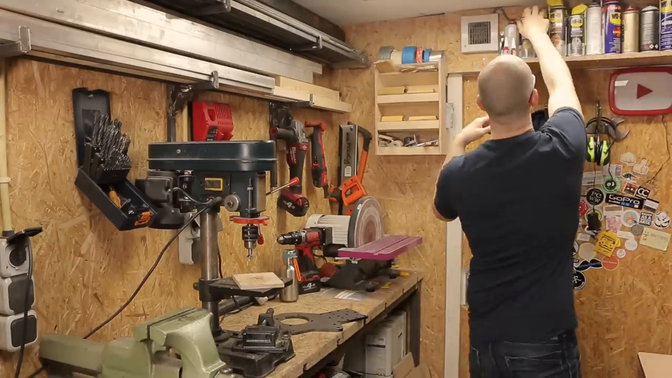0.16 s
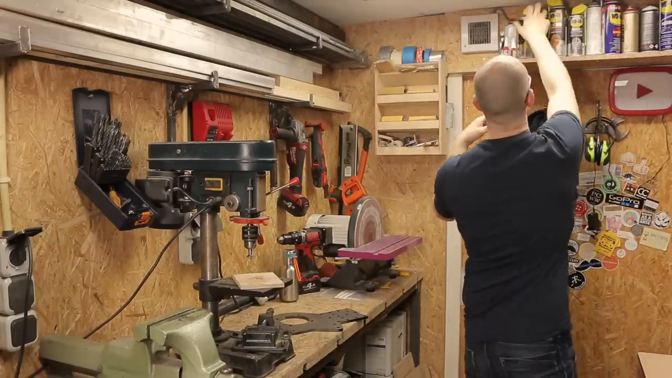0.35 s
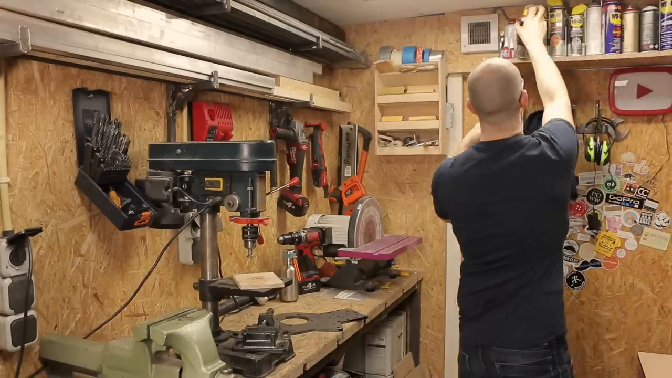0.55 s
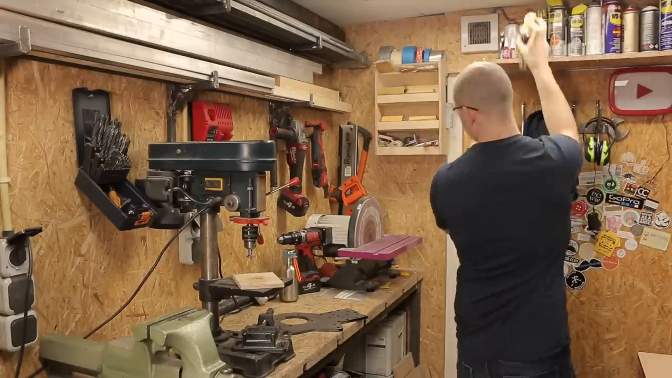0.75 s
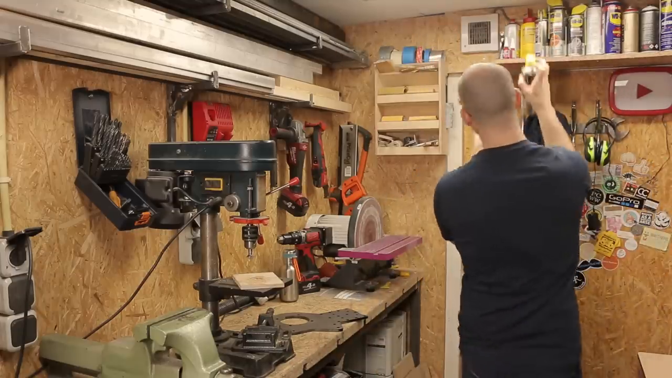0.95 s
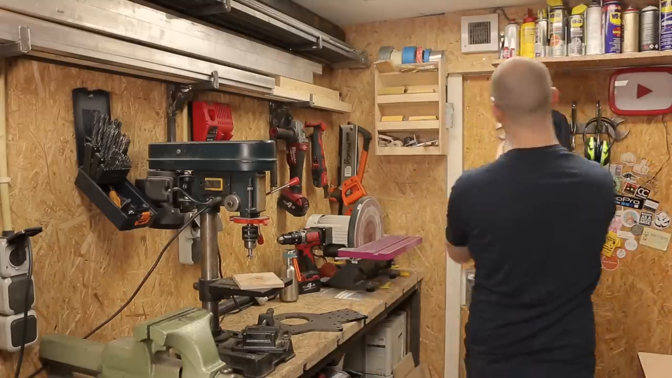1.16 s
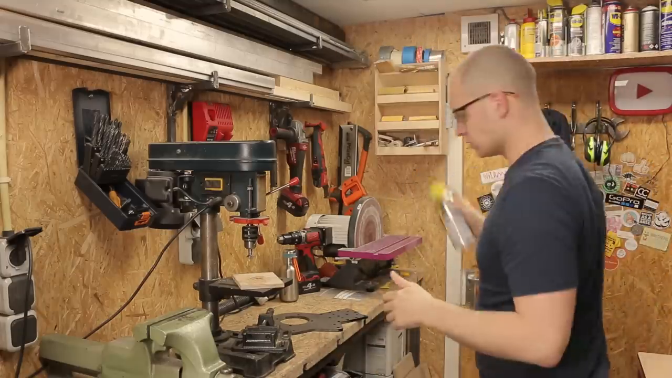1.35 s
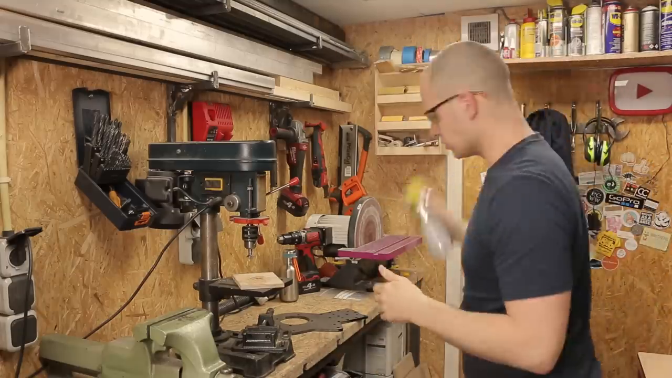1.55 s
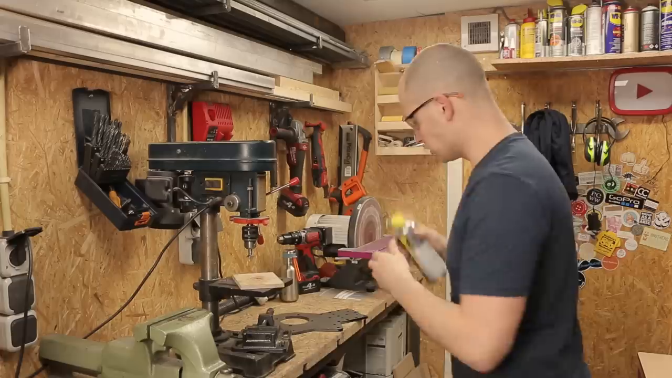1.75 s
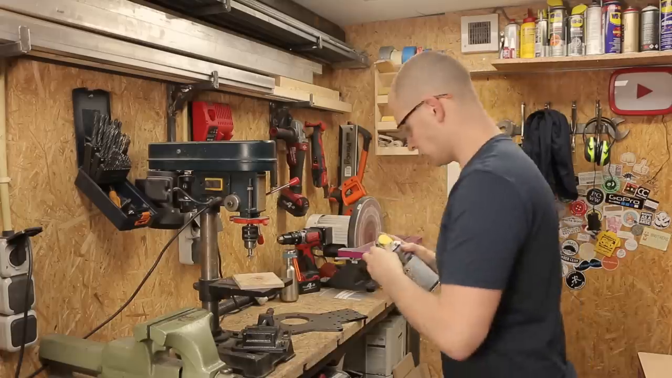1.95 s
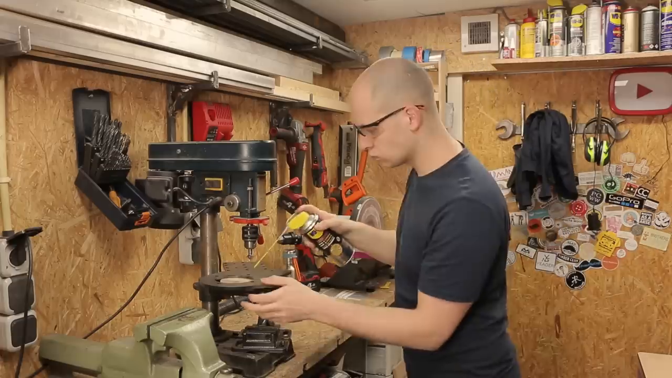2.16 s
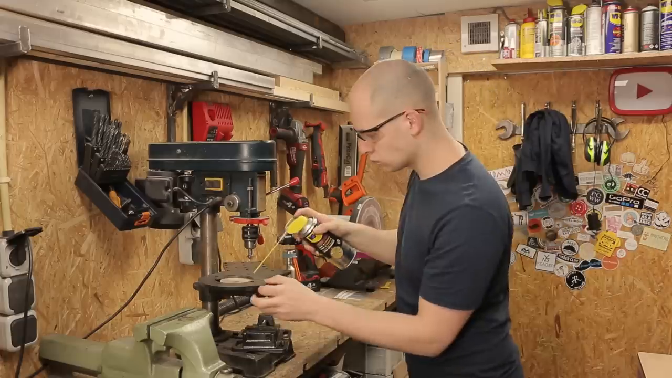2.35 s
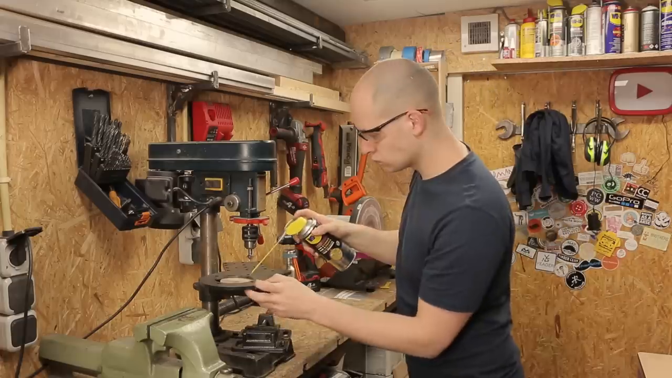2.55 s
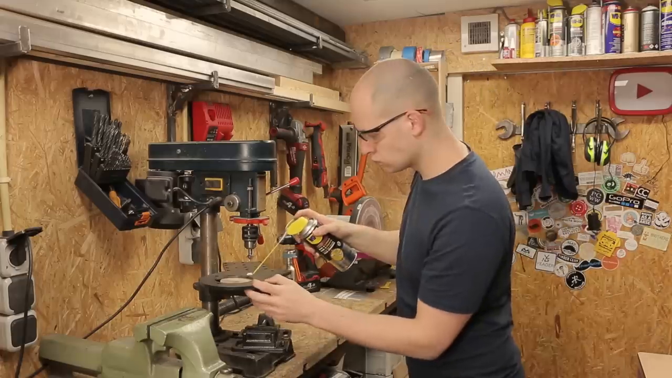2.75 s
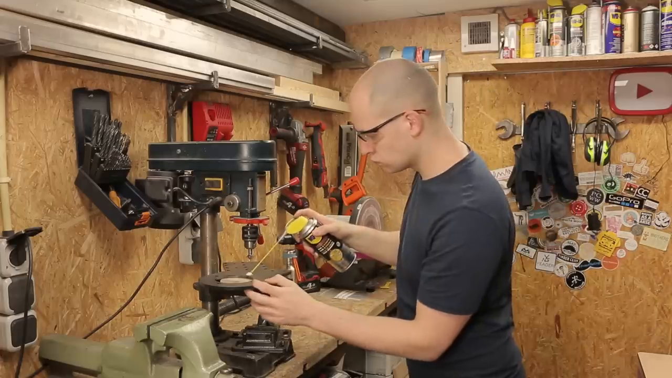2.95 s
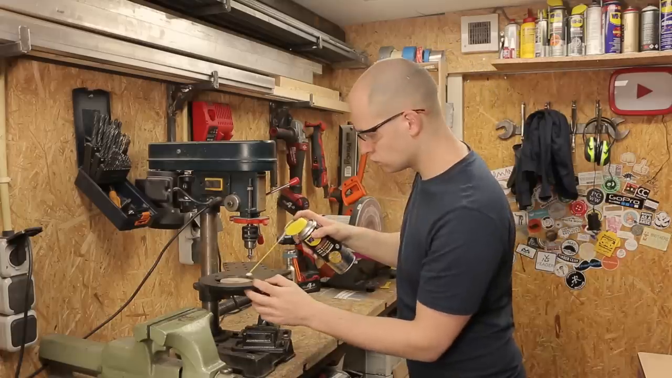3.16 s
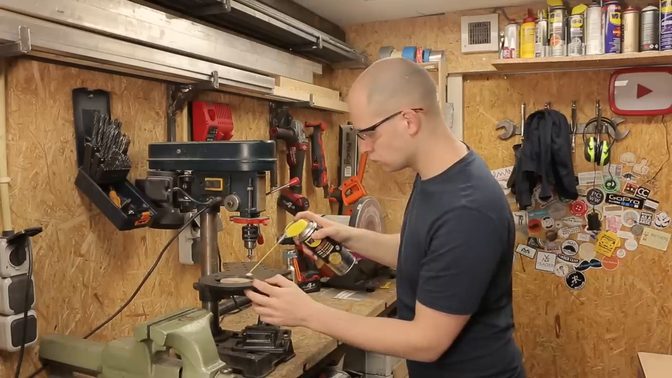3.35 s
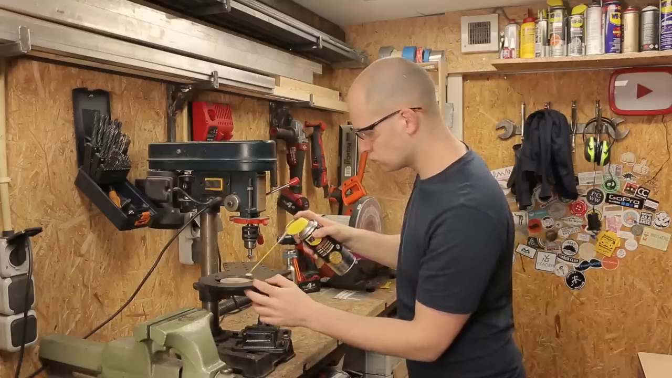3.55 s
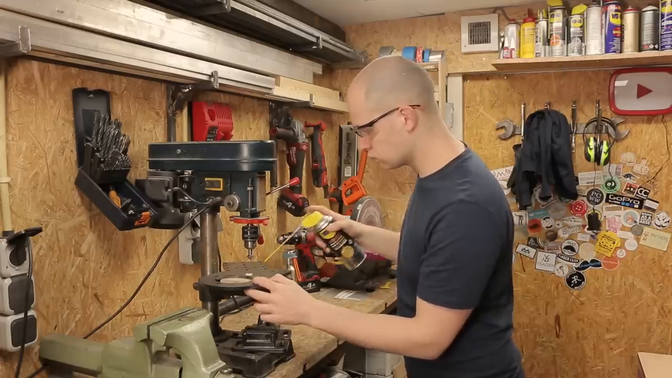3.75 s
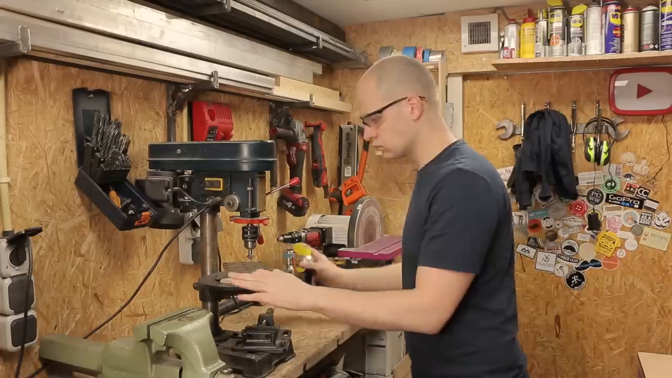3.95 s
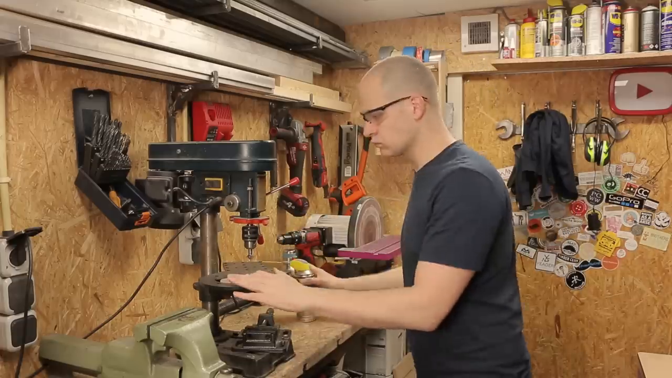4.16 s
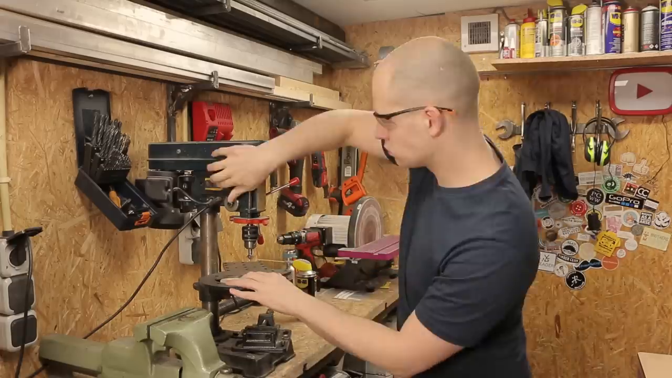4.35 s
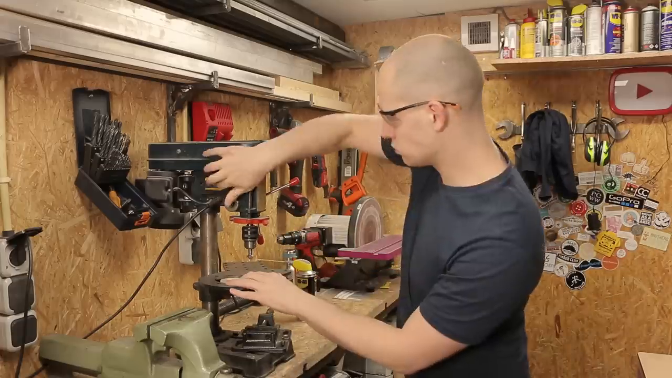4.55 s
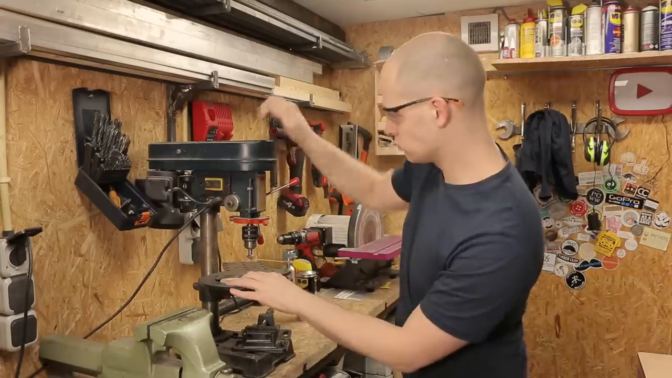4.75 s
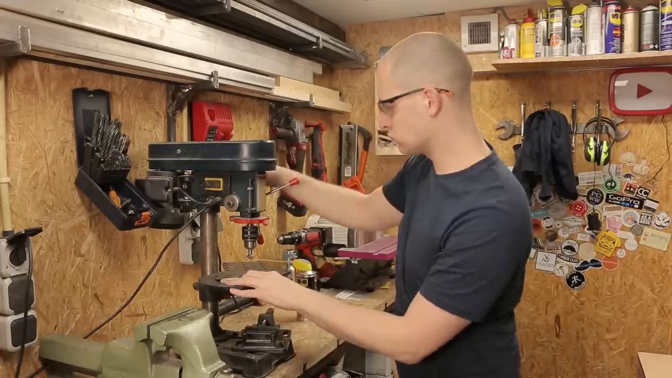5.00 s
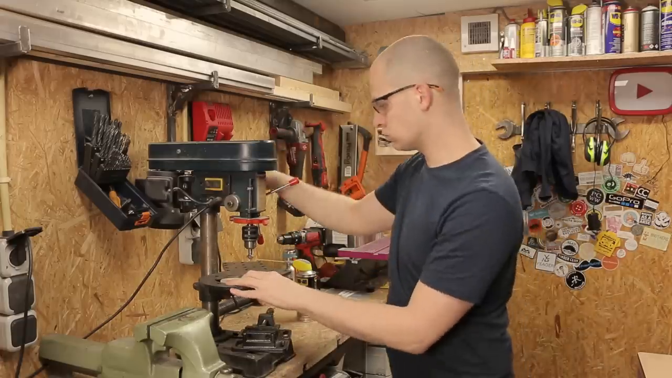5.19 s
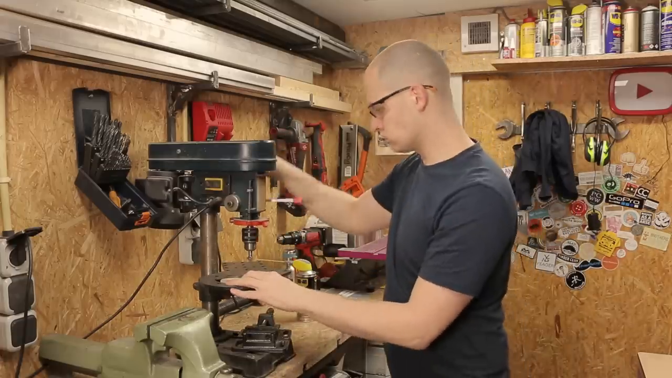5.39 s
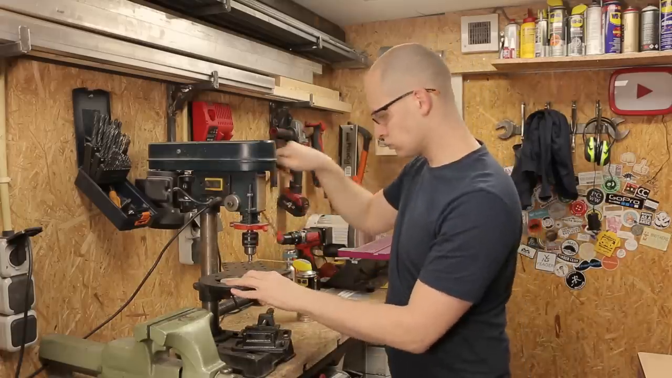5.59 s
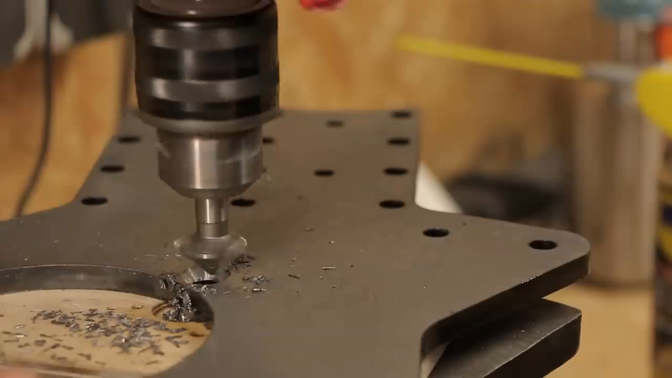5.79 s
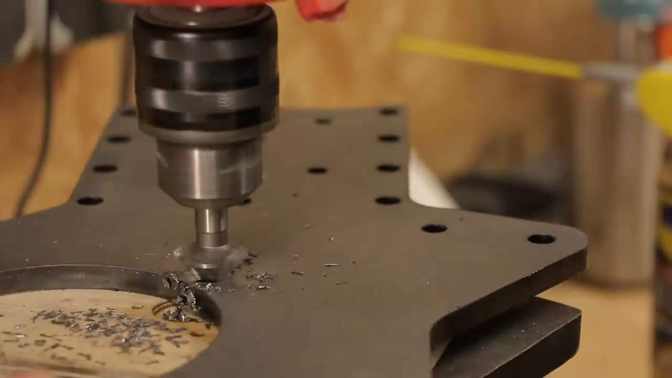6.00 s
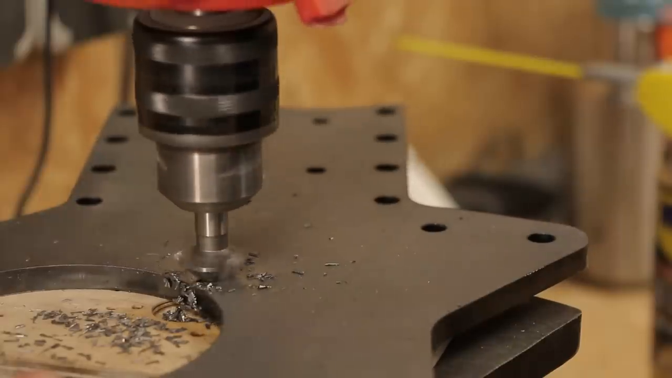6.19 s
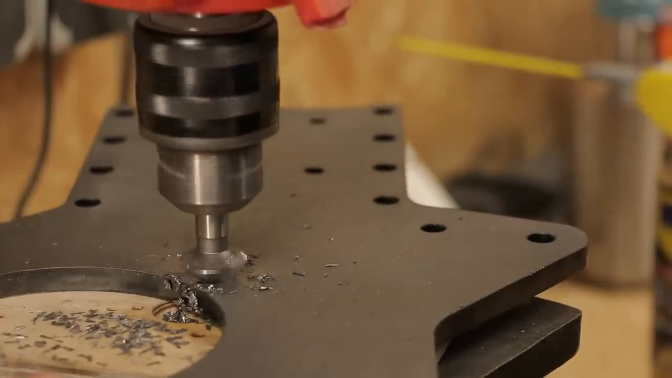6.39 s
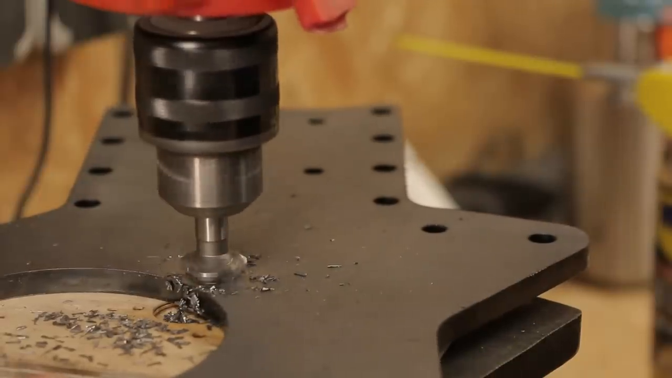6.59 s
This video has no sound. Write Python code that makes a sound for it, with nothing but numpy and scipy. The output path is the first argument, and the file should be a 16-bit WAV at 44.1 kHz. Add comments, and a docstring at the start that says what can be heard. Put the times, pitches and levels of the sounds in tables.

```python
"""A small wooden workshop, one microphone: cloth and shoes rub while a can of cutting oil bumps off a shelf.
It knocks its neighbours, its spray head clicks, and two presses send a noisy jet through a singing straw.
It lands hard on the bench as ringing modes, wobbles with an even boom and stops with a tick.
A switch snaps, hum swells up, and a countersink scrapes a steel plate once a turn: noise grains swing with
the bite and drive the resonances of plate and frame, while the belt rattles its cover."""
import sys
import numpy as np
from scipy import signal
from scipy.fft import rfft, irfft, next_fast_len
from scipy.io import wavfile
from scipy.ndimage import uniform_filter1d

SR = 44100
rng = np.random.default_rng(int(sys.argv[2]) if len(sys.argv) > 2 else 0)


def put_to_file(sound):
    """Save the sound as 16-bit audio at rate SR, in the file named by the first command-line argument."""
    columns = np.atleast_2d(sound).T  # one column per channel
    safe = np.clip(columns, -1, 1)
    whole_steps = np.round(safe * 32767)
    wavfile.write(sys.argv[1], SR, whole_steps.astype(np.int16))


N = 292559
TIME = np.arange(N) / SR   # seconds

# Room air. Each row: frequency in Hz, relative level in dB per Hz.
AIR = [(15, -49), (25, -2.5), (102, 3), (217, -15), (326, -9), (427, -14.5), (1520, -22), (1940, -19.5),
       (2350, -24.5), (4370, -21), (6380, -27.5), (14800, -29.5), (16000, -33)]
# Hiss that differs between the channels. Each row: frequency in Hz, relative level in dB per Hz.
SIDE_HISS = [(60, -6), (300, -7.0), (3000, -21.5), (16000, -12.0)]
AIR_DB, SIDE_HISS_DB = -51, -70.5   # rms
CUTOFF_HZ = 16000   # the filter's stop edge lies 600 Hz above

# Weight shifts on the floor. Each row: peak in seconds, fade in seconds, level in dB.
STEPS = [(3.33, .3, -47.5), (3.7, 0.29, -43.5)]
# Floorboard resonances. Each row: frequency in Hz, width in Hz, relative level in dB.
FLOOR = [(72, 33, 2.5), (158.8, 25, 3.0), (338, 59, -8)]

# Strokes of sleeve and shoe. Each row: peak in seconds, fade in seconds, swish in dB, scuff in dB.
STROKES = [(.02, 0.13, -49.5, -56.5), (0.563, .05, -47, -55), (.615, 0.08, -48.5, -50.5),
           (.77, 0.17, -50, -49), (.952, 0.047, -30.5, -40.5), (.985, 0.079, -41, -44),
           (1.133, 0.11, -37, -39), (1.239, 0.05, -34.5, -48), (1.334, 0.091, -40, -42.5),
           (1.427, .13, -35.5, -38.5), (1.58, 0.32, -39.5, -46.5), (1.658, 0.11, -33, -30.5),
           (1.763, 0.094, -40.5, -37.5), (2.32, 0.16, -55, -57)]
# Cloth swish. Each row: frequency in Hz, relative level in dB per Hz.
SWISH = [(1060, -94), (1800, 2), (2260, -8), (4210, 4), (5250, -3), (7910, -7.5), (15100, -18),
         (16000, -35)]
# Shoe and sleeve scuff. Each row: frequency in Hz, relative level in dB per Hz.
SCUFF = [(120, -62), (200, -11), (422, -2), (484, -15), (600, -4.5), (815, -7.5), (1080, -2), (1400, -6),
         (3000, -9), (3900, -37), (6600, -120)]

# Crack of any hard contact. Each row: frequency in Hz, relative level in dB per Hz.
CRACK = [(100, -0.5), (400, 8.5), (1400, 4), (2500, 0), (4300, 1), (6500, -7.5), (10000, -17.5),
         (16000, -30)]
# Hand and can bump the shelf. Each row: start in seconds, ring gain in dB, crack in dB, pitch factor.
SHELF_BUMPS = [(.2235, -35, -49, 0.97), (.264, -23, -50.5, 1.1), (.464, -28, -45.5, 0.63),
               (.478, -41, -58, 1.08), (.492, -26, -63, 0.31), (.53, -37, -68, 0.41),
               (.551, -47.5, -55, 0.91), (.706, -37.5, -51, 1.11)]
# Shelf modes. Each row: frequency in Hz before the pitch factor, relative level in dB, t60 in seconds.
SHELF_MODES = [(64.4, -16, 0.25), (154, -2.5, 0.096), (194.5, -0.5, 0.16), (265, -4, 0.054),
               (611, -2, 0.044), (736, -1.5, 0.014), (950, -5, 0.016)]
# The can knocks its neighbours. Each row: start in seconds, ring gain in dB, crack in dB, pitch factor.
CAN_KNOCKS = [(.762, -44, -35, 0.98), (.921, -17, -47, 0.96), (.927, -29, -22, 0.98),
              (.937, -30, -25.5, 1.1), (.955, -31, -50, 1.04), (1.134, -24, -34, .74),
              (1.14, -34, -35, 1.05), (1.229, -43, -44, 1.6), (1.753, -32.5, -46, 1.7),
              (1.764, -30, -46, 1.16)]
# Can modes. Each row: frequency in Hz before the pitch factor, relative level in dB, t60 in seconds.
CAN_MODES = [(410, -14.5, 0.081), (775, -7, 0.033), (940, 4.5, 0.031), (1060, -1, 0.035), (1116, -8, 0.14),
             (1294, 1.5, 0.026), (1530, -6.5, 0.029), (1880, -15, 0.056), (4100, -28, 0.11)]
# The can slides off the shelf. Each row: start in seconds, level in dB.
SQUEAK = [(1.069, -39.5)]
# The spray head clicks in the fingers. Each row: start in seconds, ring gain in dB, crack in dB, pitch factor.
NOZZLE_CLICKS = [(1.402, -26.5, -36, 0.9), (1.415, -25, -32, 0.88), (1.85, -41.5, -52, 0.98),
                 (1.93, -43, -53, 0.87), (1.978, -37, -44, 0.92), (2.133, -43, -36, 1.2),
                 (2.141, -49, -38, 1.0), (2.3578, -10, -40, 0.91), (2.3595, -23, -32, 1.05)]
# Spray head modes. Each row: frequency in Hz before the pitch factor, relative level in dB, t60 in seconds.
NOZZLE_MODES = [(730, -27, 0.072), (1036, -14.5, 0.029), (1250, -13.5, 0.017), (1810, -18, 0.039),
                (1840, -13, 0.023), (1905, 2.5, 0.027), (2330, 1.5, 0.0039), (3700, -10, 0.0099),
                (4210, -19, 0.025), (4700, -17.5, 0.028)]

# The valve is pressed twice. Each row: start in seconds, opening time constant in seconds,
# hold in seconds, jet level in dB before it sags.
PRESSES = [(2.615, 0.065, 0.38, -28.5), (3.312, 0.0093, 0.36, -34.5)]
JET_SAG_DB_PER_S, JET_RELEASE_DB_PER_S = 6, 77   # the release adds to the sag
# Surges as the finger trembles on the valve. Each row: peak in seconds, level in dB.
SURGES = [(2.684, -28), (3.07, -32), (3.155, -34.5), (3.241, -38), (3.598, -30.5), (3.687, -34),
          (3.778, -36)]
SURGE_FADE_S = 0.064
# Jet noise. Each row: frequency in Hz, relative level in dB per Hz.
JET = [(250, -10.5), (700, -1), (1500, 1), (2300, 4.5), (3000, 3.5), (3900, 6), (4800, 5), (6000, 0.5),
       (7700, -2), (9900, 2.5), (10800, -3), (13500, 1.5), (18000, -7)]
# Oil straw resonances. Each row: frequency in Hz, width in Hz, relative level in dB.
STRAW = [(3015, 96, 2), (3920, 91, 1.5), (4400, 110, -37), (6480, 51, 0), (7640, 360, -3.5),
         (9900, 120, -7), (11860, 200, -7.5), (13400, 150, -20)]
# The valve spits. Each row: start in seconds, level in dB.
SPITS = [(3.206, -37), (3.3205, -30), (3.852, -44), (3.875, -36)]
# Colour of the spits. Each row: frequency in Hz, relative level in dB per Hz.
SPIT_COLOUR = [(2000, -1), (6000, -3), (8000, 4), (17000, -16)]

# The can lands on the bench. Each row: start in seconds, ring gain in dB, crack in dB, pitch factor.
BENCH_KNOCKS = [(4.1492, 2.5, -13.5, 0.94), (4.179, -17, -32, 0.57)]
# Bench modes. Each row: frequency in Hz before the pitch factor, relative level in dB, t60 in seconds.
BENCH_MODES = [(184, -16, 0.054), (231, -3.5, 0.078), (332, 2.5, 0.026), (551, -15, 0.1),
               (684, -6.5, 0.037), (866, -36, 0.055), (1270, -39, 0.057), (1450, -1, 0.011),
               (2290, -7.5, 0.0083)]
# Boom of the rocking can. Each row: frequency in Hz, width in Hz, relative level in dB.
BOOM = [(228, 28.5, 0), (290, 49, -1.6)]
# Grit under the rim. Each row: frequency in Hz, relative level in dB per Hz.
GRIT = [(70, 12), (500, -22), (1000, -11), (2500, -29), (4500, -16), (7000, -44)]
# Last tick as the can sits flat. Each row: start in seconds, level in dB.
SEATING = [(4.382, -21.5)]
ROCK_START_S, ROCK_RISE_S, ROCK_DB, ROCK_RING_DB = 4.18, 0.024, -30.5, -49
LAST_SWING_S, LAST_SWING_DB = 0.0235, 14.5   # time before the tick; boost of boom and grit

# The switch snaps. Each row: start in seconds, ring gain in dB, crack in dB, pitch factor.
SWITCH_SNAPS = [(4.504, -30, -26, 0.92)]
# Switch modes. Each row: frequency in Hz before the pitch factor, relative level in dB, t60 in seconds.
SWITCH_MODES = [(465, -4, 1), (960, -8, .06), (1090, 0, 0.026), (2090, -10, 0.075), (4400, -5, 0.032),
                (4640, -12, 0.028)]
# The switch spring buzzes. Each row: start in seconds, level in dB.
SWITCH_SPRING = [(4.504, -32.5)]
# Spring resonances. Each row: frequency in Hz, width in Hz, relative level in dB.
SPRING = [(4270, 280, -4.5), (6400, 360, -2.5), (7300, 690, -8), (9500, 1900, -14.5)]

SWITCH_ON_S, BITE_S, DEEPEST_CUT_S, MID_CUT_S = 4.505, 4.625, 4.695, 5.65
SPINDLE_HZ = 12.37   # turns per second
# Hum of motor and pulleys. Each row: frequency in Hz, mean level in dB rms at full swell.
HUM = [(49.6, -48), (55.8, -55), (61.9, -38), (74.3, -48), (86.6, -51.5), (100, -32), (179.6, -41.5)]

# Extra slaps of the belt beside its regular flaps, the first one hard. Each row: start in seconds, peak in dB
# before smoothing and shake gain.
RATTLES = [(4.7187, -2), (4.936, -13.5), (5.8641, -16)]
# Bouts of harder cover buzz. Each row: peak in seconds, fade in seconds, level in dB.
BOUTS = [(4.88, 0.26, -26.5), (5.24, 0.41, -28.5)]
# Sheet cover resonances. Each row: frequency in Hz, width in Hz, relative level in dB.
COVER = [(990, 580, -4), (1320, 90, 4), (1392, 32, 8), (1453, 28, 6.5), (1502, 22, 7), (1730, 130, 0.5),
         (1853, 84, 3), (2057, 8.3, 5), (2190, 53, -4)]
FLAP_START_S, FLAP_HZ = 4.661, 20.94
FLAP_DB, SETTLE_DB_PER_S, FLAP_SPREAD_DB = -10, 6.5, 2.7   # first flap, before smoothing and shake gain
BUZZ_DB, BUZZ_SETTLE_DB_PER_S = -37, 3.5   # buzz at mid cut, and its easing

# Frame resonances. Each row: frequency in Hz, width in Hz, relative level in dB.
FRAME = [(99, 62, -6), (207, 49, -6.5), (291, 86, -3), (341, 23, 1), (368.6, 14.5, 3.5), (427.3, 26, 3),
         (540.7, 22.7, 0), (647, 65, -1.5), (699.6, 24.6, 4), (755, 38, -0.5), (812, 200, -8), (943, 15, 0),
         (1006, 83, -10.5), (1173, 19, -5), (1271, 34, -8)]
# The cutter grabs and the frame judders. Each row: peak in seconds, fade in seconds, level in dB.
JUDDERS = [(4.772, 0.13, -21), (5.26, .25, -25), (5.49, 0.47, -22.5), (5.915, .12, -18), (6.19, .25, -22.5),
           (6.62, .2, -23)]
# Plate resonances. Each row: frequency in Hz, width in Hz, relative level in dB at mid cut,
# change in dB per second as the cone widens.
PLATE = [(2620, 39, 7.5, -3.5), (3259, 46, 8.5, 0.5), (3460, 80, 2.5, 2), (3796, 180, 3.5, -3),
         (4390, 105, 2.5, 0.5), (4700, 61, 2.5, 0), (5522, 35, 6, 6.5), (5680, 36, -8, 19),
         (6800, 97, -4, -5), (7020, 51, -11, 2)]
# The edge digs in and the plate sings. Each row: peak in seconds, fade in seconds, level in dB.
DIGS = [(4.67, 0.081, -26.5), (5.0, 0.27, -32.5), (5.49, 0.4, -29), (6.2, 1, -29.5), (6.62, 0.73, -32)]
# Tearing chips. Each row: frequency in Hz, relative level in dB per Hz.
CHIPS = [(1500, -6), (2500, 4.5), (3800, 2.5), (5000, 1), (7000, 3), (8600, -4), (9700, 5), (11000, -7),
         (14000, -9)]
# The edge rubbing. Each row: frequency in Hz, relative level in dB per Hz.
SIZZLE = [(5000, 2), (9000, 4), (11500, 0), (13800, 7), (18000, -18)]
FRAME_DB, PLATE_DB = -25, -37.5   # floors under judders and digs; the frame's is lower at first touch
CHIPS_DB = -34   # before the first bite, turn and waver terms
FIRST_BITE_DB, FIRST_BITE_S = 8, 0.15   # extra chip level at the first bite, and its decay constant
SECOND_TURN_DB, SECOND_TURN_LAG = 1.5, 0.96   # chips are louder on every other turn; lag in turns


def from_db(db):
    """Decibels to gain."""
    return 10 ** (np.asarray(db) / 20)


def rms_one(x):
    """Scale to unit power."""
    return x / np.sqrt(np.mean(x ** 2) + 1e-20)


def drift(rate):
    """Smooth chance: normal knots of spread 1, rate per second, joined by straight lines."""
    knots = rng.standard_normal(N // 20)
    return np.interp(TIME * rate, np.arange(len(knots)), knots)


def colour(x, spectrum):
    """Shape a noise by a spectrum, falling steeply beyond its ends; rms 1."""
    hz, db = np.transpose(spectrum)
    size = next_fast_len(len(x))
    f = np.maximum(np.fft.rfftfreq(size, 1 / SR), 1)
    beyond = np.minimum(f / hz[0], 1) ** 3 * np.minimum(hz[-1] / f, 1) ** 3
    gain = beyond * from_db(np.interp(np.log(f), np.log(hz), db))
    return rms_one(irfft(rfft(x, size) * gain, size)[:len(x)])


def resonate(x, resonances):
    """Parallel two-pole resonances with alternating signs."""
    out = 0
    for k, (hz, width, db) in enumerate(resonances):
        r = np.exp(-np.pi * width / SR)
        poles = [1, -2 * r * np.cos(2 * np.pi * hz / SR), r * r]
        gain = (-1) ** k * from_db(db) * (1 - r * r) / 2
        out = out + gain * signal.lfilter([1, 0, -1], poles, x + 1e-18)
    return out


def grains(per_s, spread_db):
    """Random tiny contacts of uneven size; rms 1."""
    hits = rng.random(N) < per_s / SR
    size = rng.standard_normal(N)
    uneven = from_db(spread_db * np.clip(rng.standard_normal(N), -2, 2))
    return rms_one(hits * size * uneven)


def bursts(rows, t60):
    """An envelope that jumps at each (s, dB) and dies away by 60 dB in t60 seconds."""
    kicks = np.zeros(N)
    for s, db in rows:
        kicks[round(s * SR)] = from_db(db)
    return signal.lfilter([1], [1, -from_db(-60 / (t60 * SR))], kicks + 1e-18)


def swells(rows, rise=.75):
    """Each (peak s, fade s, dB) dies away by 20 dB per fade; the rise takes a share of that time."""
    levels = [db - 20 * np.maximum((s - TIME) / rise, TIME - s) / fade for s, fade, db in rows]
    return from_db(np.max(levels, axis=0))


def strikes(rows, modes, crack_t60):
    """Each blow rings the body's decaying modes under a short noisy crack."""
    out, t = np.zeros(N), np.arange(SR // 2) / SR
    for s, ring_db, crack_db, pitch in rows:
        ring = sum((-1) ** k * from_db(db - 60 * t / t60) * np.sin(2 * np.pi * hz * pitch * t)
                   for k, (hz, db, t60) in enumerate(modes))
        crack = colour(rng.standard_normal(len(t)), CRACK) * from_db(-60 * t / crack_t60)
        at = round(s * SR)
        out[at:at + len(t)] += from_db(ring_db) * ring + from_db(crack_db) * crack
    return out


def workshop(x, wet_db, t60=0.14, wall_hz=6000):
    """Dense, short reflections from cluttered wooden walls, dulled above wall_hz."""
    t = np.arange(SR // 2) / SR
    tail = rng.standard_normal(len(t)) * from_db(-60 * t / t60) * (t > .004)   # nothing in the first 4 ms
    dulling = signal.butter(1, min(wall_hz, SR / 3), fs=SR, output="sos")
    tail = signal.sosfilt(dulling, tail)
    return x + from_db(wet_db) * signal.fftconvolve(x, tail / np.linalg.norm(tail))[:N]


def room_air():
    """Steady coloured noise of the room."""
    return from_db(AIR_DB) * colour(rng.standard_normal(N), AIR)


def floorboards():
    """A soft low rumble under the feet: noise in wide, low resonances."""
    return swells(STEPS, rise=0.92) * rms_one(resonate(rng.standard_normal(N), FLOOR))


def clothing():
    """Cloth and shoes rub: strokes of grainy swish and duller scuff noise."""
    swish = swells([(s, fade, db) for s, fade, db, _ in STROKES], rise=0.87)
    scuff = swells([(s, fade, db) for s, fade, _, db in STROKES], rise=0.77)
    cloth = swish * colour(grains(9000, spread_db=0.5), SWISH)
    return cloth + scuff * colour(rng.standard_normal(N), SCUFF)


def handling():
    """The can is fetched: struck shelf, can and spray head ring, and sliding squeaks in one resonance."""
    bumps = strikes(SHELF_BUMPS, SHELF_MODES, crack_t60=0.1)
    knocks = strikes(CAN_KNOCKS, CAN_MODES, crack_t60=0.059)
    squeak = bursts(SQUEAK, t60=0.33) * rms_one(resonate(rng.standard_normal(N), [(4560, 320, 0)]))
    nozzle = strikes(NOZZLE_CLICKS, NOZZLE_MODES, crack_t60=0.016)
    return squeak + workshop(bumps + knocks, wet_db=-8) + workshop(nozzle, wet_db=-10.5)


def valve():
    """Each press opens the jet, which sags while held and dwindles on release; the stronger of jet and surge wins."""
    flow = 0
    for start, opening, hold, db in PRESSES:
        t = np.maximum(TIME - start, 0)
        released = np.maximum(t - hold, 0)
        level_db = db - JET_SAG_DB_PER_S * t - JET_RELEASE_DB_PER_S * released
        flow = flow + (1 - np.exp(-t / opening)) * from_db(level_db)
    return np.maximum(flow, swells([(s, SURGE_FADE_S, db) for s, db in SURGES], rise=0.67))


def spray(echo_s=0.001333, echo_db=-12, flutter_db=1.1, straw_db=-6):
    """A jet with spitting droplets sings in the straw; its echo off the plate ripples the spectrum."""
    hiss = rng.standard_normal(N) + from_db(-12) * grains(900, spread_db=3)   # air and droplets
    hiss = hiss + from_db(echo_db) * np.interp(TIME - echo_s, TIME, hiss)
    straw = from_db(straw_db) * rms_one(resonate(rng.standard_normal(N), STRAW))
    jet = rms_one(colour(hiss, JET) + straw)
    spits = bursts(SPITS, t60=0.09) * colour(rng.standard_normal(N), SPIT_COLOUR)
    return valve() * from_db(flutter_db * drift(90)) * jet + spits


def rocking(stop_s=0.023, wobble_hz=42, wobble_db=3):
    """The wobble throbs until the can sits flat and swells on its last swing. Gives gains of boom and ring."""
    left = SEATING[0][0] - TIME   # seconds until the tick
    rocks = np.clip((TIME - ROCK_START_S) / ROCK_RISE_S, 0, 1) * np.clip(left / stop_s, 0, 1)
    swing = uniform_filter1d(1.0 * (left < LAST_SWING_S), size=500)
    throb_db = wobble_db * (1 - swing) * np.cos(2 * np.pi * wobble_hz * left)
    boom_gain = rocks * from_db(ROCK_DB + LAST_SWING_DB * swing + throb_db)
    return boom_gain, rocks * from_db(ROCK_RING_DB)


def can_set_down(grit_db=-13):
    """A heavy knock of bench modes; the can wobbles, ringing faintly, and stops dead with a tick."""
    knock = strikes(BENCH_KNOCKS, BENCH_MODES, crack_t60=0.022)
    knock = workshop(knock, wet_db=-16.0, t60=0.17, wall_hz=1990)
    wobble, ring = rocking()
    boom = resonate(rng.standard_normal(N), BOOM)
    # the rim stays in contact, so the boom is even
    boom = rms_one(boom / np.sqrt(uniform_filter1d(boom ** 2, size=700) + 1e-12))
    grit = from_db(grit_db) * colour(rng.standard_normal(N), GRIT)
    tick = bursts(SEATING, t60=0.015) * colour(rng.standard_normal(N), CRACK)   # the rim comes down flat
    return knock + wobble * (boom + grit) + ring * np.sin(2 * np.pi * 1350 * TIME) + tick


def switch():
    """A hard snap of struck modes and the short buzz of a spring, noise in its resonances."""
    snap = strikes(SWITCH_SNAPS, SWITCH_MODES, crack_t60=0.031)
    spring = bursts(SWITCH_SPRING, t60=0.18) * rms_one(resonate(rng.standard_normal(N), SPRING))
    return workshop(snap, wet_db=-13.5) + spring


def motor(run_up_s=0.21, waver_db=1.0):
    """Mains hum and pulley unbalance, sines of fixed pitch, swell as the motor comes up to speed."""
    swell = np.clip((TIME - SWITCH_ON_S) / run_up_s, 0, 1)
    hum = 0
    for hz, db in HUM:
        gain = np.sqrt(2) * from_db(db + waver_db * drift(5.4))
        hum = hum + gain * np.sin(2 * np.pi * (hz * TIME + rng.random()))
    return swell * hum


def belt_cover(shake_db=-9, jitter_s=0.0024):
    """Each flap of the belt swells the sheet cover's chatter over a buzz; both ease as the belt settles."""
    beats = np.arange(FLAP_START_S, TIME[-1] - 1 / FLAP_HZ, 1 / FLAP_HZ)
    flaps = []
    for s, (late, hard) in zip(beats, rng.standard_normal((len(beats), 2))):
        db = FLAP_DB - SETTLE_DB_PER_S * (s - FLAP_START_S) + FLAP_SPREAD_DB * hard
        flaps.append((s + jitter_s * late, db))
    easing_buzz = from_db(BUZZ_DB - BUZZ_SETTLE_DB_PER_S * (TIME - MID_CUT_S))
    buzz = np.maximum(easing_buzz, swells(BOUTS, rise=1.0))
    slaps = uniform_filter1d(bursts(flaps + RATTLES, t60=0.028), size=260)
    shaking = slaps * from_db(shake_db) + buzz
    chatter = grains(3000, spread_db=-0.5)
    return resonate(chatter * shaking, COVER) / np.std(resonate(chatter, COVER))


def frame_rumble(turns, depth, swing_db=0.9, slap_turn=.71, slap_db=8):
    """Cutting grains, bearing knocks and spindle slap drive the frame's resonances; rms 1."""
    # play in the spindle gives a low slap at the same point of each turn
    slapping = (turns - slap_turn) % 1 < .07
    slap = from_db(slap_db) * slapping * resonate(rng.standard_normal(N), [(330, 196, 0)])
    # worn bearings repeat the same small knocks on every turn
    one_turn = grains(1500, spread_db=7.0)[:round(SR / SPINDLE_HZ)]
    bearings = from_db(-4.5) * np.resize(one_turn, N)
    contacts = (grains(1500, spread_db=4.5) + bearings) * from_db(swing_db * depth)
    return rms_one(resonate(contacts + slap, FRAME))


def plate_ring(depth, swing_db=3.0, wander_db=1.5):
    """Tearing grains feed each plate resonance in its own way as the edge moves; rms 1."""
    contacts = grains(6000, spread_db=4.5) * from_db(1.2 * drift(40))
    tearing = contacts * from_db(swing_db * depth)
    since = np.clip(TIME - MID_CUT_S, -1, 1)
    plate = 0
    for k, (hz, width, db, change) in enumerate(PLATE):
        feed = tearing * from_db(change * since + wander_db * drift(16))
        plate = plate + (-1) ** k * resonate(feed, [(hz, width, db)])
    return rms_one(plate)


def chip_hiss(depth, chip_swing_db=4.5, sizzle_swing_db=9.5, sizzle_db=-3):
    """Chips tear off in uneven spurts and the edge sizzles: grains through a short, dense tail of reflections;
    rms 1."""
    spurts_db = 2.2 * drift(120) + 1.9 * drift(22)
    chips = colour(grains(11000, spread_db=6.5) * from_db(chip_swing_db * depth + spurts_db), CHIPS)
    flicker_db = 2.2 * drift(160) + 1.3 * drift(14)
    sizzle = colour(grains(11000, spread_db=12) * from_db(sizzle_swing_db * depth + flicker_db), SIZZLE)
    # a dense burst of short, early reflections gives the hiss a fine ripple across the treble
    t = np.arange(SR // 40) / SR
    echoes = rng.standard_normal(len(t)) * from_db(-60 * t / 0.031)
    return rms_one(signal.fftconvolve(chips + from_db(sizzle_db) * sizzle, echoes)[:N])


def drill(bite_rise_s=0.033, idle_db=-10, skew=0.087, light_load_db=-3, chip_waver_db=2.47):
    """The cutter bites deeper once a turn; chips hiss, the plate rings and the frame rumbles."""
    turns = (TIME - DEEPEST_CUT_S) * SPINDLE_HZ + 0.041 * drift(10)
    # the bite rises a little slower than it falls, never twice to the same depth
    depth = (np.cos(2 * np.pi * turns) + skew * np.sin(4 * np.pi * turns)) * from_db(1.2 * drift(17))
    bite = np.clip((TIME - BITE_S) / bite_rise_s, 0, 1)
    running = (TIME > SWITCH_ON_S) * np.maximum(bite, from_db(idle_db))
    # at the first touch the chips are loud and the frame is still lightly loaded
    breaking_in = np.exp(-np.maximum(TIME - BITE_S, 0) / FIRST_BITE_S)
    second_turn = np.cos(np.pi * (turns + SECOND_TURN_LAG))
    chip_db = CHIPS_DB + FIRST_BITE_DB * breaking_in + SECOND_TURN_DB * second_turn
    chips = from_db(chip_db + chip_waver_db * drift(12)) * chip_hiss(depth)
    plate = np.maximum(from_db(PLATE_DB), swells(DIGS, rise=0.56)) * plate_ring(depth)
    frame_gain = np.maximum(from_db(FRAME_DB + light_load_db * breaking_in), swells(JUDDERS, rise=0.47))
    frame = frame_gain * frame_rumble(turns, depth)
    return running * frame + bite * (belt_cover() + plate + chips)


def scene():
    """All sources reach one microphone; only a faint hiss differs between the channels."""
    background = room_air() + floorboards() + clothing()
    can = handling() + spray() + can_set_down()
    press = switch() + motor() + workshop(drill(), wet_db=-16.5)
    mid = background + can + press
    side = from_db(SIDE_HISS_DB) * colour(rng.standard_normal(N), SIDE_HISS)
    return np.array([mid + side, mid - side])


def record(dry):
    """Peaks beyond full scale overload and clip; then a steep low-pass cuts the top."""
    low_pass = signal.cheby2(16, 60, CUTOFF_HZ + 600, fs=SR, output="sos")
    return signal.sosfilt(low_pass, np.clip(dry, -1, 1))


dry = scene()
out = record(dry)
put_to_file(out)
```